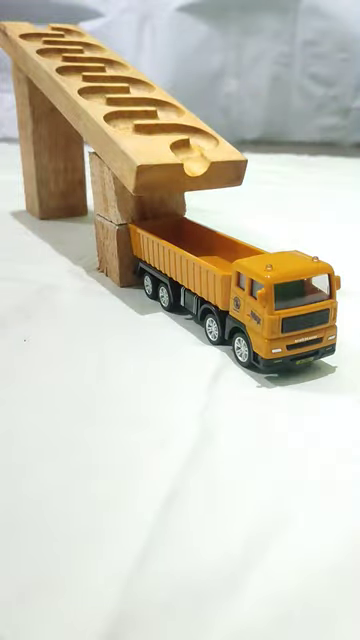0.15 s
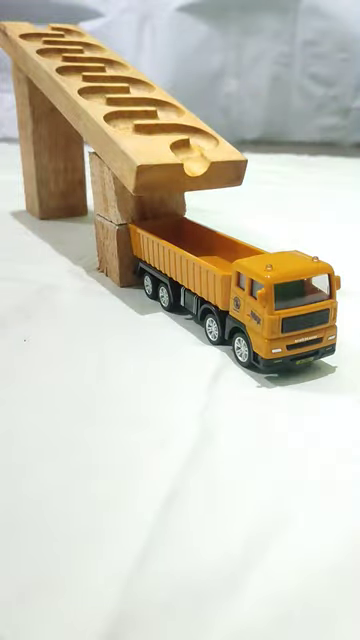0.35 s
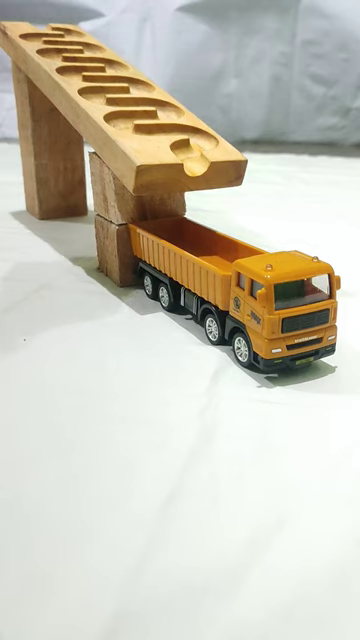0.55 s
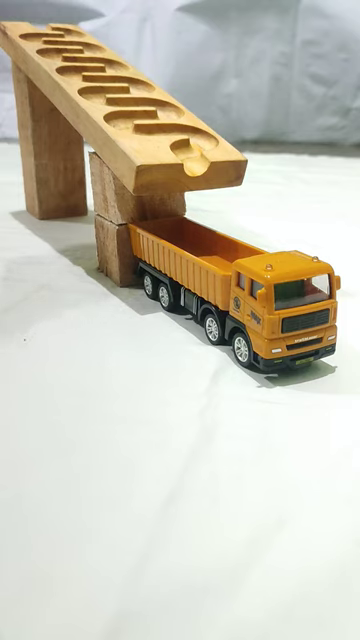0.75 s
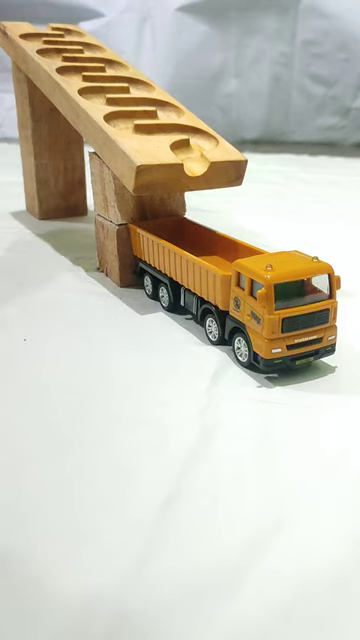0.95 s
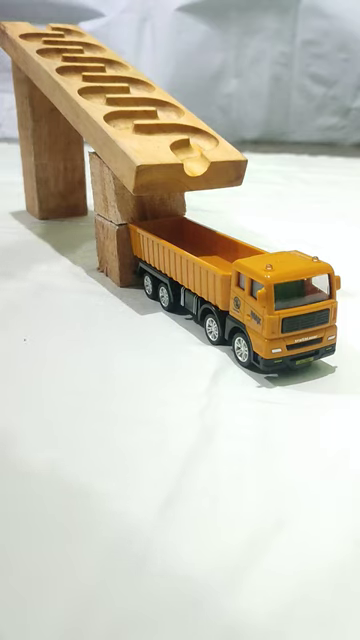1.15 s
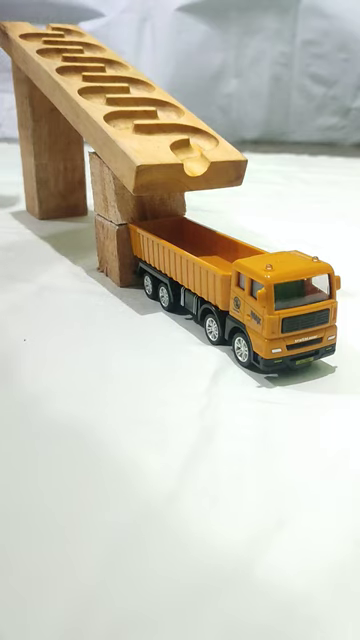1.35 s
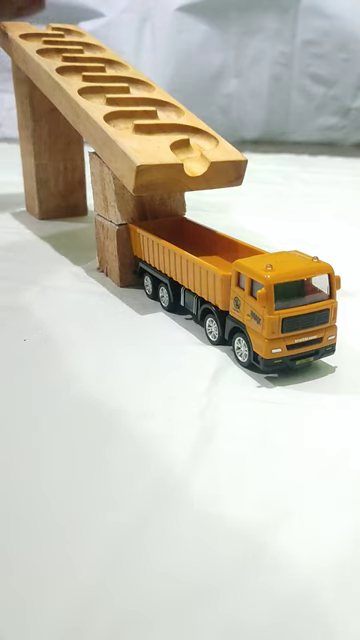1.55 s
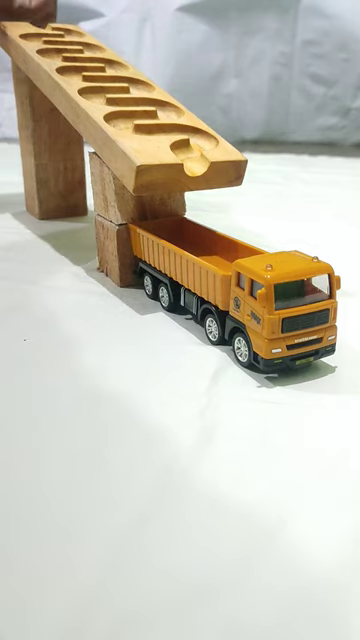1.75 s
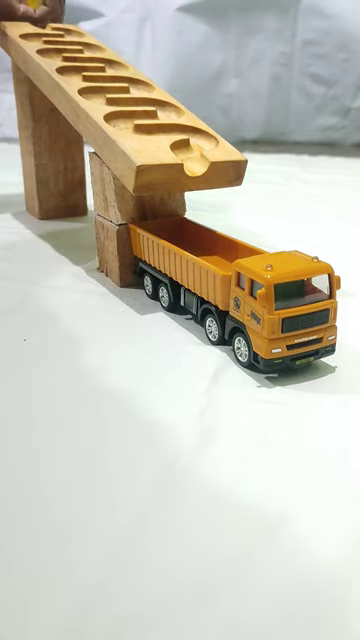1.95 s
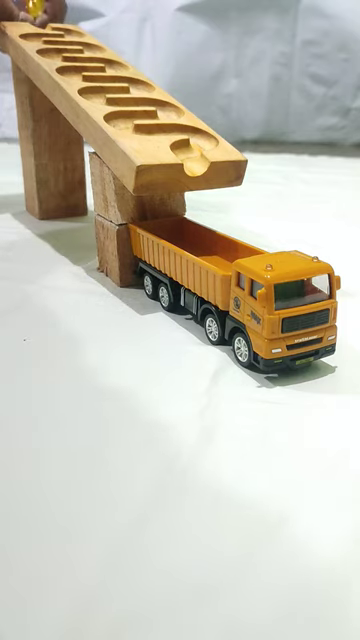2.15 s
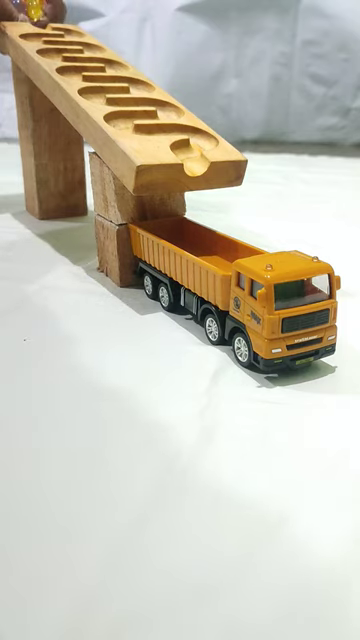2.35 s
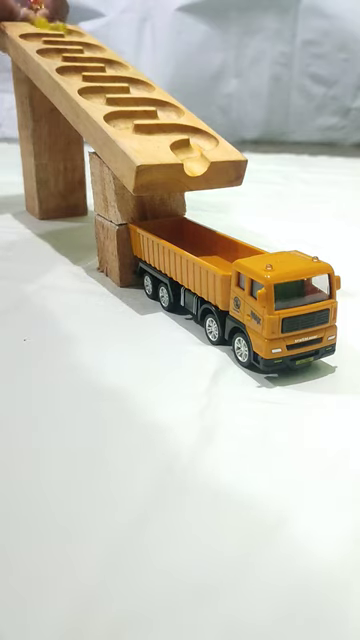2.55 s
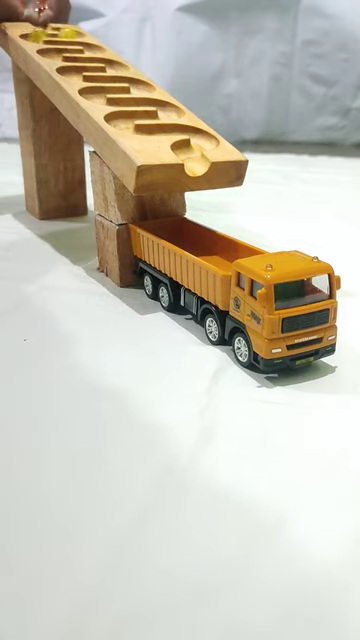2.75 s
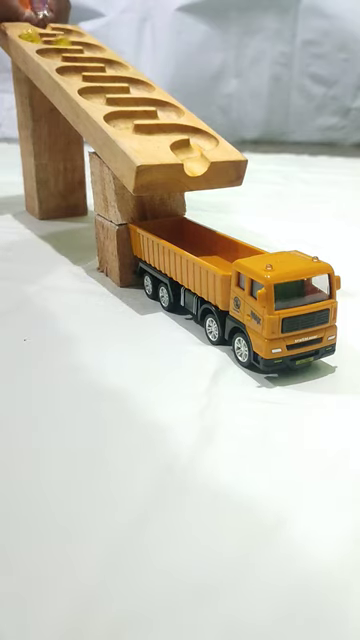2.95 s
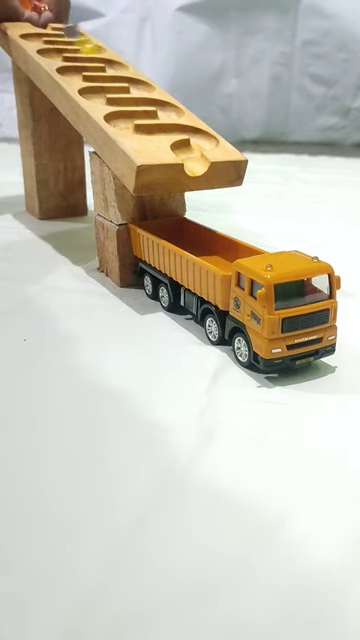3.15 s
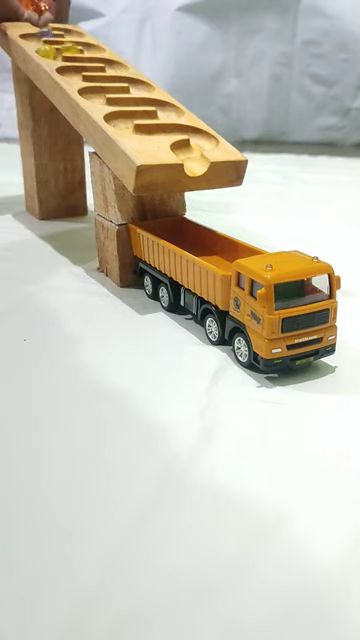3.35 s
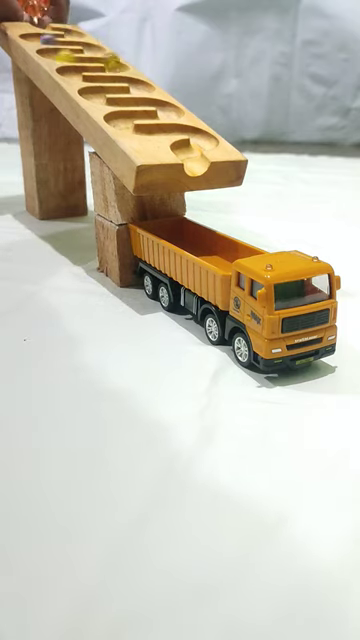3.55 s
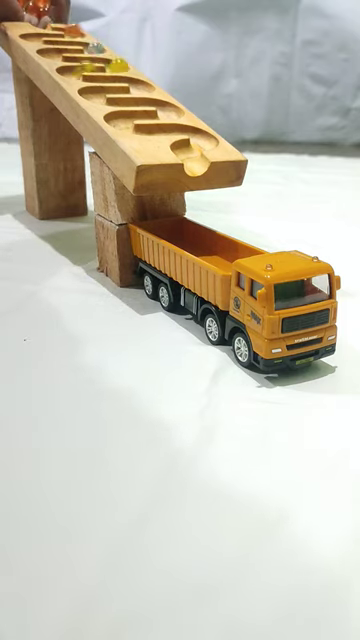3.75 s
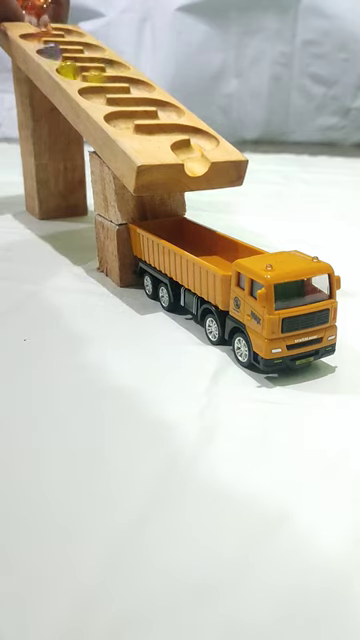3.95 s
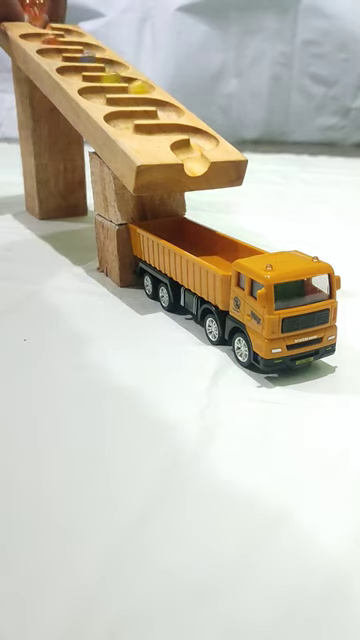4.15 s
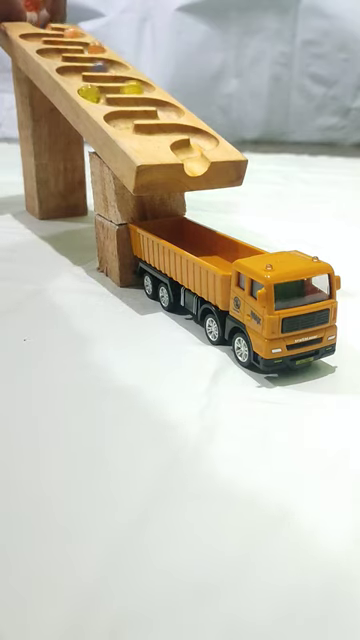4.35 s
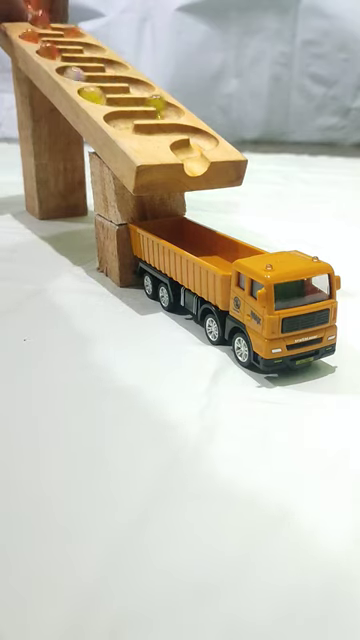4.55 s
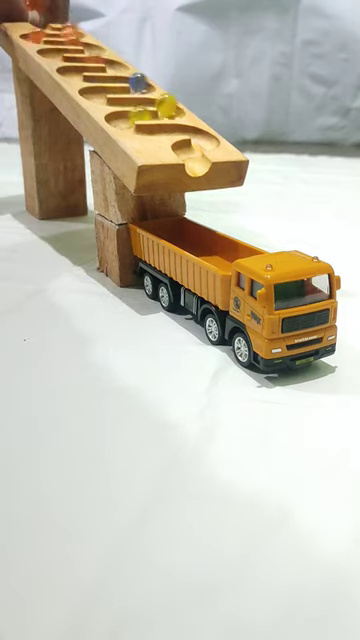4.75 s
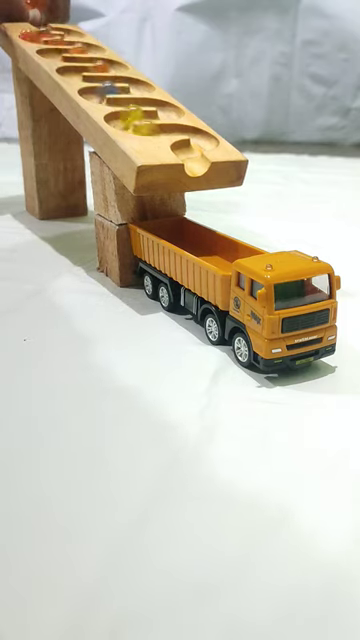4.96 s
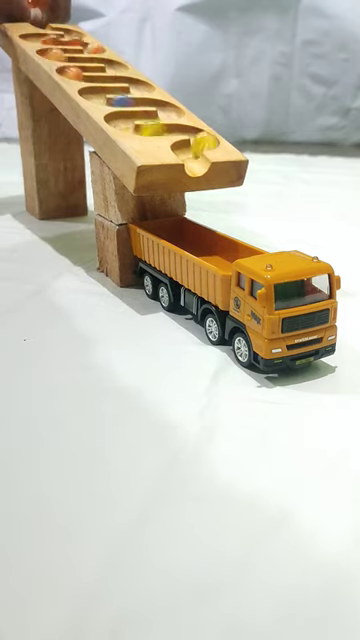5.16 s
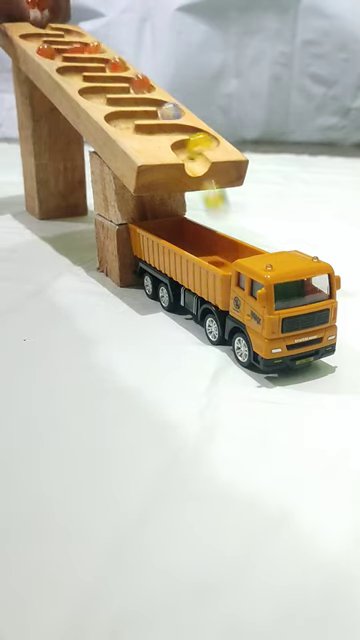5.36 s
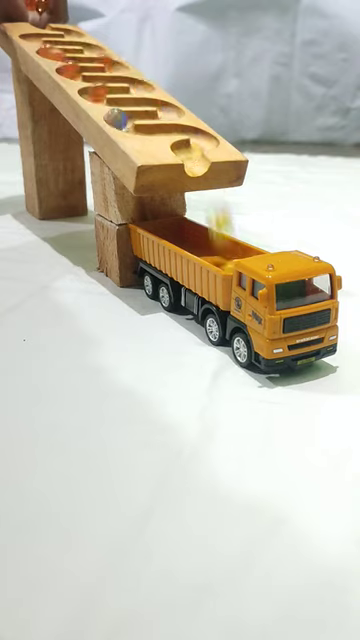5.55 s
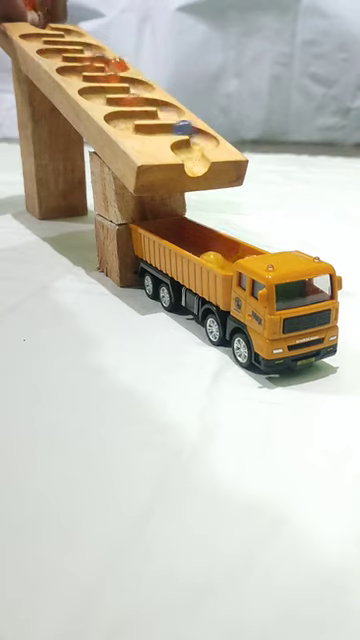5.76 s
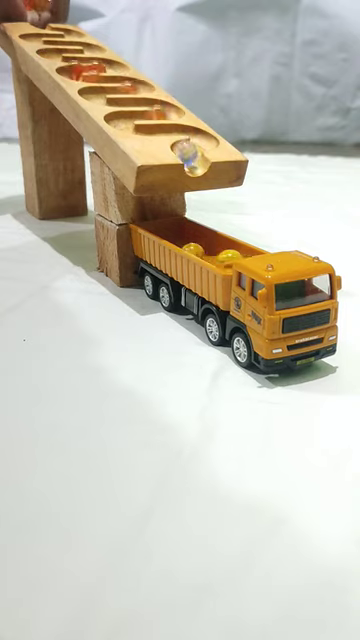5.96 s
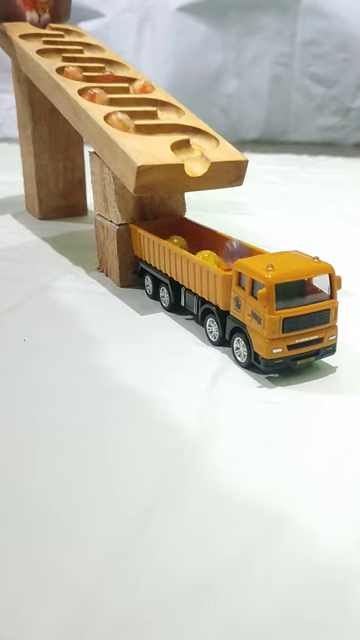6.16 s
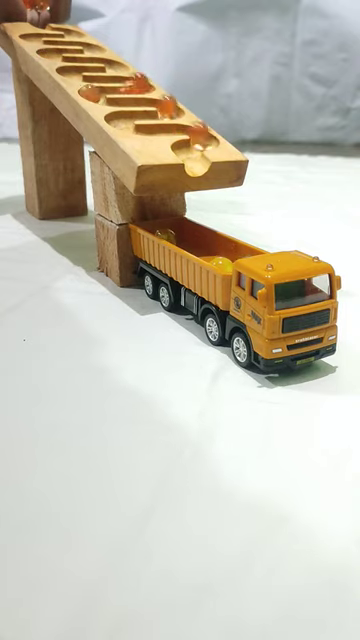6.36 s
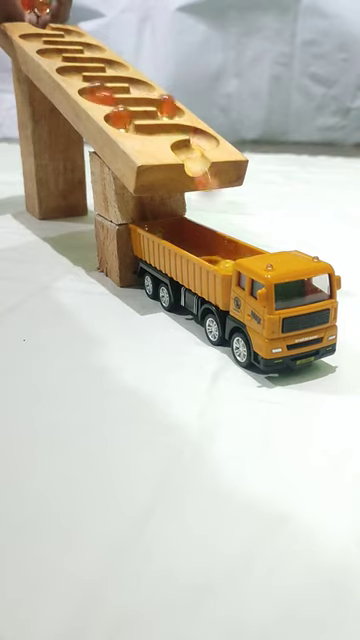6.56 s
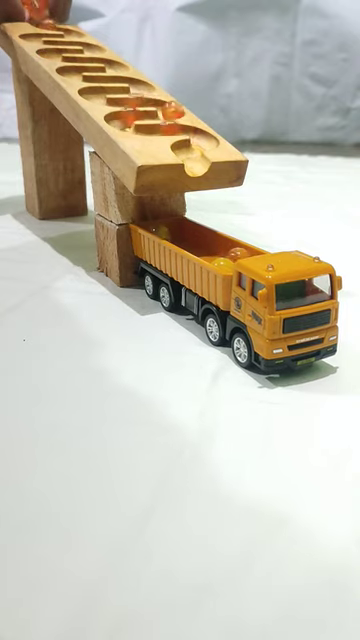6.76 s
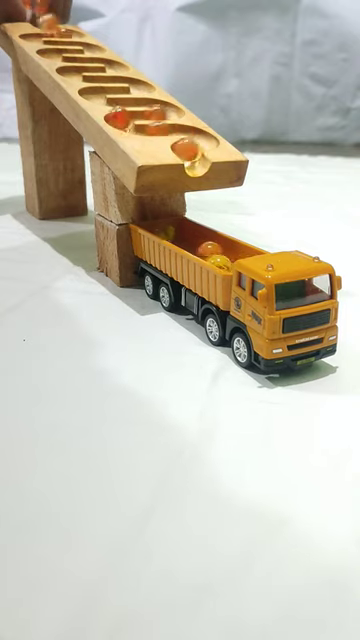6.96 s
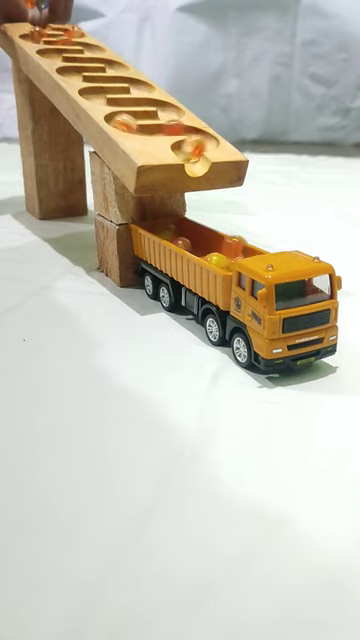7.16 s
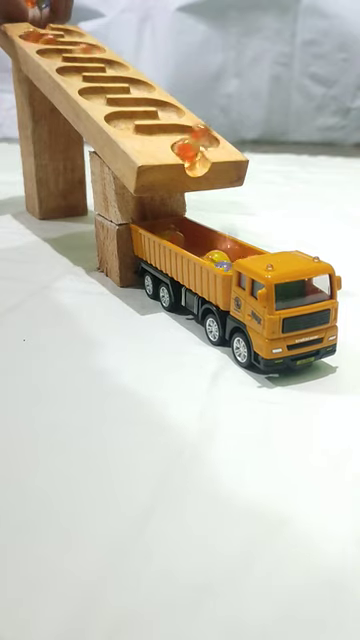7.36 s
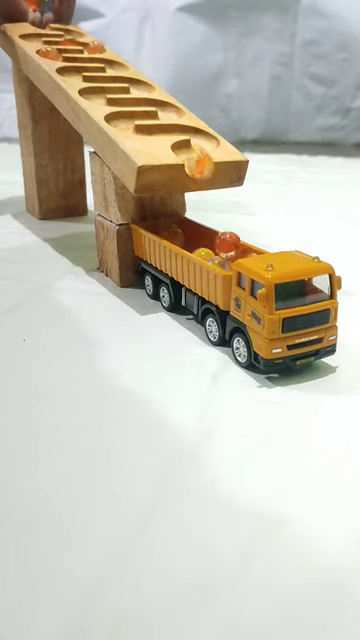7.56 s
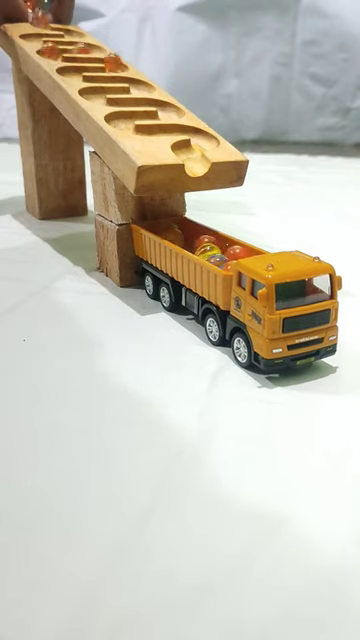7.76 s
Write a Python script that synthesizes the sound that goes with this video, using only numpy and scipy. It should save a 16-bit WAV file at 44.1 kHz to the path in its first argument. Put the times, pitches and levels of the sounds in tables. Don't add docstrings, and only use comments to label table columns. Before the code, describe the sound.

Over two seconds of near silence, a hand barely brushes fabric, with small snapping ticks mostly on the right. Then marbles click together and clatter along wooden grooves, irregular hollow knocks over a light rolling rattle. In the last few seconds, much louder brittle clacks land in a little truck bed, each followed by hops and glassy jostling, crowding together at the end. Close stereo pickup in a small reflective room.

```python
import sys
import numpy as np
from scipy import signal
from scipy.io import wavfile
from scipy.ndimage import uniform_filter1d

SR = 44100
rng = np.random.default_rng(int(sys.argv[2]) if len(sys.argv) > 2 else 0)


def transcribe(signal):
    frames = np.atleast_2d(signal).T
    limited = np.clip(frames, -1, 1)
    pcm = np.round(limited * 32767).astype(np.int16)
    wavfile.write(sys.argv[1], SR, pcm)


def gain_from_db(level_db):
    decades = np.asarray(level_db, float) / 20
    return 10 ** decades


N = 344862

# start_s, blow_db, middle_over_first_mode_db, upper_modes_db
KNOCKS = [(2.5406, -19.5, -6, -29), (2.5727, -15.5, 4, -23), (2.6548, -12, 2.5, -17.5),
          (2.7355, -18.5, -1, -31), (3.1574, -10.5, 5.5, -15), (3.242, -21, 0, -14.5),
          (3.267, -23.5, 8, -14), (3.697, -20.5, -6, -24), (3.7229, -13.5, 5, -18.5),
          (3.8382, -17, -5, -20.5), (4.2718, -8, 1.5, -21.5), (4.375, -20, -0.5, -35),
          (4.5563, -17, -7.5, -49), (4.6024, -20, 0, -12.5), (4.6425, -19, -11, -19),
          (4.6662, -29, 14, -16), (4.6802, -12.5, 3, -20.5), (4.7244, -17.5, -8, -18),
          (4.7691, -15, 8.5, -17.5), (4.8395, -12.5, -3, -24.5), (4.9729, -27, -7, -11),
          (5.4123, -19.5, 1, -18), (6.4625, -20.5, 3, -17), (6.5239, -21.5, -5, -15.5),
          (6.6095, -21.5, -5.5, -19.5), (6.8482, -11.5, 1.5, -37), (6.9177, -12, 1, -19.5),
          (7.1174, -11.5, 1.5, -19.5), (7.1381, -7, 3, -17), (7.223, -24, -9, -11)]
# start_s, blow_db, sharpness_db
TAPS = [(2.5601, -25, -9), (2.683, -27, -2), (2.692, -31, -4.5), (2.7744, -29, -19), (2.903, -28.5, -29),
        (3.037, -32, -31), (3.055, -33, -38), (3.082, -34, -25), (3.14, -27, -30), (3.487, -47, -26),
        (4.108, -34.5, -29), (4.121, -47, -23), (4.147, -30, -27), (3.1324, -36, -32), (3.457, -27.5, -33),
        (3.5785, -24, -30), (3.6305, -23.5, -31), (3.6476, -28, -22.5), (3.734, -20.5, -15.5),
        (3.8844, -31.5, -4.5), (3.965, -30.5, -16), (4.1639, -26, -27.5), (4.395, -26.5, -15),
        (4.4156, -26, -12), (4.58, -25, -16.5), (4.666, -24.5, -8.5), (4.354, -36, -16), (2.811, -45, -25),
        (4.6574, -19, -18), (4.882, -37, -2), (4.9038, -26.5, -15), (4.918, -34, -1), (4.9389, -26, -11.5),
        (4.95, -28, -13), (5.0589, -55, -14), (5.1038, -49, -17), (5.1396, -27.5, -28), (5.217, -30.5, -17),
        (5.259, -39, -28), (5.8682, -30, -23), (6.0148, -35.5, -12), (6.0578, -31, -32), (5.2954, -28, -25),
        (5.3348, -27.5, -30), (5.3555, -21.5, -16), (5.916, -26.5, -28), (5.9468, -29, -13.5),
        (6.0396, -33.5, -17), (6.3609, -23.5, -29), (6.578, -32, -19), (7.0083, -24.5, -7.5)]
TAP_MIDDLE_DB, TAP_MIDDLE_SLOPE = 16.5, 0.73
# time_s, rolling_db, speed_brightness_db
ROLLING = [(2.5, -84, -4), (2.72, -57, 4), (2.9, -54, 0.5), (3.24, -46, 0.5), (3.54, -57.5, -5.5),
           (3.79, -37.5, 4.5), (3.95, -74.5, -13.5), (4.17, -43.5, -2), (4.34, -47, -0.5), (4.72, -48, 4),
           (4.94, -36, 2.5), (5.08, -52.5, -3.5), (5.21, -37, 0), (5.3, -46.5, 1.5), (5.97, -40, 0),
           (6.15, -51, -5.5), (6.5, -42.5, 0.5), (7.82, -43.5, 7.5)]
BUMPS_PER_S, DRIFT_DB, DRIFT_S = 600, 6, 0.025
WANDER, WANDER_S = 0.025, 0.07
# pitch_hz, level_db
RAMP_MODES = [(505, -25.5), (590, -19.5), (720, -14), (1290, -5), (1420, 0.6), (1650, -8.5), (2300, -3),
              (2530, 1.5), (2650, -22), (3210, -14), (3530, -7.5), (3900, 0), (5200, 0), (7070, 4.5)]
RAMP_T60 = [0.078, 0.028, 0.0097, 0.02, 0.055, 0.033, 0.028, 0.026, 0.028, 0.15, 0.06, 0.022, 0.011, 0.0067]
RAMP_GROUPS = [0, 0, 0, 1, 1, 1, 2, 2, 2, 3, 3, 3, 4, 4]
TOP_MODES_DB = -5.5
# mode_strength_db from spot to spot, bump_size_db
SPREAD_DB = [2.5, 2.5]
# wood_rise_s, landing_rise_s, landing_fall_s, room_build_up_s
SOFTNESS_S = [0.00079, 0.00084, .0014, 0.014]
# start_s, blow_db, centre_hz
CLICKS = [(2.434, -29, 7340), (2.4957, -33, 7300), (2.654, -36, 6700), (2.684, -33.5, 6850),
          (2.9067, -29.5, 7200), (3.039, -49, 6700), (3.1605, -35, 6100), (3.263, -41, 6580),
          (3.4927, -48.5, 6800), (3.838, -37.5, 6800), (4.273, -35, 7200), (4.388, -42.5, 9000),
          (4.452, -38, 9000), (4.468, -32.5, 7000), (4.492, -29, 8700), (4.498, -36, 9000),
          (4.6567, -31, 7200), (5.0594, -50.5, 6620), (5.1386, -45, 7000), (5.4106, -40, 6660),
          (6.0336, -42, 6660), (6.5254, -33, 7130), (6.626, -38.5, 6850), (6.724, -32.5, 8000),
          (7.0044, -36, 7000), (6.4415, -69, 8000), (6.495, -36, 7000), (6.5757, -56, 7500),
          (6.9399, -38, 8000), (4.074, -47.5, 6900), (4.442, -38, 8000), (2.694, -30, 7000),
          (3.14, -47, 7000), (4.972, -46.5, 7240), (4.884, -40, 7500), (2.4332, -41.5, 3800),
          (2.4955, -57, 3300)]
# start_s, blow_db, centre_hz
SPARKS = [(3.4947, -56, 8000), (3.604, -56, 9900), (4.387, -36, 10000), (4.448, -36.5, 10000),
          (4.4688, -30.5, 8500), (4.4893, -29, 10000), (4.6047, -43, 9000), (4.644, -44, 10000),
          (4.657, -34.5, 10000), (5.6359, -35, 9000), (6.5258, -30.5, 9000), (6.5758, -37, 9000),
          (6.629, -30, 8500), (6.9399, -41, 10000), (7.0068, -27, 9000), (7.311, -30, 9000),
          (7.344, -35, 8000), (7.7571, -20, 8000), (6.305, -32, 9000)]
# start_s, blow_db, ring_hz
NUDGES = [(2.5633, -44.5, 5050), (2.691, -32.5, 5200), (3.1422, -54, 4730), (3.266, -35.5, 5070),
          (3.7237, -38, 5100), (3.8377, -45, 4850), (3.886, -37, 5150), (4.274, -37.5, 5240),
          (4.418, -37, 4900), (4.6075, -37.5, 4540), (4.6543, -39, 5150), (4.803, -37.5, 4380),
          (4.887, -41, 4700), (4.9046, -37.5, 4800), (5.1632, -45, 4730), (5.349, -41, 5100),
          (5.386, -43, 5000), (6.442, -45, 5030), (6.495, -34.5, 4400), (6.523, -40, 5200),
          (7.012, -32, 4430)]
CLICK_PAN_DB, NUDGE_PAN_DB = -3.5, -16.5
# start_s, blow_db, left_right_db, bed_db, clack_db (upper panels)
FALLS = [
    (5.4865, -6.5, 2.5, 1, 0.5),
    (5.6675, -7, 7.5, 0, 0),
    (6.1874, -6.5, 1, -1.5, 1.5),
    (6.7381, -6.5, 4, -4, 0.5),
    (7.2461, -7.5, -7.5, -0.5, 2),
    (7.4845, -6, 5.5, -1.5, -0.5),
    (7.6445, -6, 0, -1.5, 3.5),
]
# start_s, blow_db, bed_db (low when glass meets glass), clack_db, sparkle_db
HOPS = [(5.5577, -18, -3.5, -4, -7.5), (5.7441, -16, -1.5, 1, 1), (6.2611, -17.5, 1, -1, -3),
        (6.8179, -14.5, -4, -3.5, -9), (7.3259, -15.5, -1, -2.5, -4), (7.558, -14.5, 1, 1.5, -1.5),
        (7.726, -15.5, 3.5, 2.5, 3.5), (7.482, -20, -0.5, 4, 2), (5.483, -28, -4, -11, -2),
        (5.613, -19.5, -2.5, -0.5, -1.5), (5.7918, -17.5, -2, -1.5, -3), (6.1801, -16, -10, 4, 4),
        (6.2873, -23.5, -4, -0.5, -4), (6.8074, -15.5, -3, 4.5, 3), (7.3497, -20.5, 0, 0.5, -3),
        (7.394, -29, -29, 4, 0), (7.7594, -8, -0.5, 1, -3), (7.7875, -7.5, -2, -1, -4),
        (6.7364, -14, 2, 3, -3)]
FALL_SPARKLE_DB, HOP_PAN_DB = -5, 8
# pitch_hz, density_db_per_hz
BED_CHATTER = [(300, -18.5), (1000, 0), (1450, -2), (2100, -4.5), (2950, -2), (3900, -2.5), (4900, -11),
               (6000, -4), (6900, -0.5), (7600, -9), (8500, -9.5), (11500, -5), (14000, -10.5),
               (15500, -17.5)]
# pitch_hz, level_db, t60_s
BED_RINGS = [(1350, -22, 0.017), (1618, -19, 0.036), (2323, -23.5, 0.027), (2920, -25, 0.019),
             (3730, -14.5, 0.014), (4050, -6.5, 0.0072), (4390, -14, 0.007), (5960, -19, 0.006),
             (6620, -29, 0.026), (6845, -20, 0.022), (7200, -11, 0.0097), (7750, -20.5, 0.01)]
CHATTER_DB, PANEL_SPREAD_DB = -1, 3.5
# start_s, left_db, right_db
JOLTS = [
    (5.4851, -41, -15),
    (5.668, -41, -10.5),
    (6.1892, -35, -10.5),
    (6.738, -27, -6),
    (7.2422, -38, -9.5),
    (7.4843, -33.5, -14),
    (7.6428, -31, -4),
    (7.7856, -34, -24),
]
# smoothing_hz, left_recovery_hz, right_hold_hz, right_recovery_hz
SWING_HZ = [160, 55, 2.8, 1.2]
# pitch_hz, t60_s
ROOM_T60 = [(300, 1), (1000, 0.45), (2500, 0.49), (6000, 0.34), (12000, 0.28)]
# delay_s, left_db, right_db, extra_right_lag_samples
WALL_ECHOES = [
    (.0097, -7.5, -10.5, 5),
    (0.0185, -9.5, -12, -8),
    (0.036, -22, -22, 9),
]
TAIL = SR * 9 // 20
DULL_DB = -2
# pitch_hz, left_right_db
PORTS = [(500, 0.5), (1300, -4.5), (2400, 0.8), (4400, -3), (8000, -0.5), (15000, -0.5)]
# start_s, rise_s, fall_s, level_db
STROKES = [(0.579, 0.039, 0.0075, -60), (.76, .015, 0.012, -71), (.865, 0.027, 0.031, -66.5),
           (.97, 0.048, 0.086, -64), (1.1, 0.068, 0.15, -70), (1.33, 0.05, 0.041, -76),
           (1.45, 0.036, 0.035, -75), (1.63, 0.02, 0.014, -68), (1.71, 0.051, 0.037, -68.5),
           (1.8, 0.016, 0.026, -71.5), (1.97, 0.015, 0.02, -72.5), (2.07, 0.031, 0.0092, -69),
           (2.16, 0.038, 0.044, -69.5), (4.41, 0.17, 0.057, -50.5), (4.5, 0.05, 0.14, -53),
           (4.06, .05, 0.079, -71), (6.5, 0.0083, 0.061, -46.5), (7.02, 0.018, 0.45, -52.5),
           (3.56, 0.13, 0.23, -68.5)]
# pitch_hz, density_db_per_hz
CLOTH = [(300, -9.5), (1000, -3.5), (2000, 2), (5000, -2.5), (7000, 2.5), (8200, -13), (13500, -9.5),
         (15000, -19)]
# start_s, level_db, centre_hz, left_right_db
TICKS = [
    (.3925, -53, 700, -28),
    (.70, -55, 3500, -8),
    (1.554, -53.5, 500, -23),
    (1.813, -73, 6000, -10),
    (2.074, -41.5, 6060, -46),
    (2.13, -42, 9000, -13),
    (2.168, -42.5, 6640, -43),
]
# start_s, level_db
FIBRES = [(0.39, -51), (0.5133, -63), (0.5363, -60), (0.5368, -55), (0.5448, -58), (0.5637, -53),
          (0.7019, -64), (0.7538, -64), (0.8571, -65), (0.8571, -49), (0.9704, -41.5), (1.2217, -56),
          (1.4752, -60), (1.54, -52), (1.556, -54), (1.6163, -50), (1.6193, -51), (1.6268, -46),
          (1.673, -48), (1.7165, -39), (1.7493, -47.5), (1.795, -50), (1.8145, -48), (1.9486, -54),
          (2.0449, -48), (2.0528, -66), (2.0528, -47), (2.0738, -58), (2.1307, -59), (2.167, -54)]
# pitch_hz, density_db_per_hz
HUSH = [(8.8, -30), (15, 23), (55, -5.5), (162, -13.5), (236, -15.5), (344, -23.5), (422, -21.5),
        (548, -26), (634, -26.5), (13700, -39.5), (15400, -59)]
HUSH_DB = -65
# pitch_hz, left_right_likeness
HUSH_LIKENESS = [(60, 0.26), (240, 0.65), (950, 0), (3770, 0), (15000, 0)]
# pitch_hz, left_right_db
HUSH_LEAN = [(60, -3.5), (240, -2), (950, -1.5), (3770, -4.5), (15000, -3.5)]
CEILING = 0.9


def read(points, hz):
    f, value = np.transpose(points)
    return np.interp(np.log(hz + 1), np.log(f + 1), value)


def curve(rows):
    s, db = np.transpose(rows)
    return gain_from_db(np.interp(np.arange(N) / SR, s, db, -140, -140))


def evened(x):
    return x / np.sqrt(np.mean(x ** 2) + 1e-20)


def add(mix, s, sound):
    part = mix[..., round(s * SR):][..., :sound.shape[-1]]
    part += sound[..., :part.shape[-1]]


def panned(db, pan_db):
    return gain_from_db(db + np.array([[pan_db / 4], [-pan_db / 4]]))


def colour(x, db_of):
    hz = abs(np.fft.fftfreq(2048, 1 / SR))
    log_gain = np.log(gain_from_db(np.maximum(db_of(hz), -100)))
    taps = np.fft.ifft(np.exp(np.conj(signal.hilbert(log_gain)))).real[:1024]
    taps = taps.reshape((1,) * (x.ndim - 1) + (-1,))
    return signal.oaconvolve(x, taps, axes=-1)[..., :x.shape[-1]]


def ramp():
    out, t = np.zeros(N), np.arange(3000) / SR
    hz, mode_db = np.transpose(RAMP_MODES)
    decay_db = -60 * t / np.array(RAMP_T60)[:, None]
    rise = 1 - np.exp(-(t / SOFTNESS_S[0]) ** 2)
    for s, db, middle_db, upper_db in knocks():
        strength, shift = rng.standard_normal((2, len(RAMP_MODES)))
        group_db = np.array([-0.3 * (db + 34), -middle_db / 2 - 10.5, middle_db / 2 - 8,
                             upper_db + 4.5, upper_db + 10 + TOP_MODES_DB])[RAMP_GROUPS]
        start_db = db + mode_db + group_db + SPREAD_DB[0] * strength
        spot_hz = hz * (1 + 0.03 * shift)
        rings = gain_from_db(start_db[:, None] + decay_db) * np.sin(2 * np.pi * spot_hz[:, None] * t)
        add(out, s, rings.sum(0) * rise)
    return out + rolling()


def knocks():
    taps = [(s, db, TAP_MIDDLE_DB + TAP_MIDDLE_SLOPE * sharp_db, sharp_db) for s, db, sharp_db in TAPS]
    return KNOCKS + taps


def rolling():
    t, out = np.arange(N) / SR, np.zeros(N)
    s, _, speed_db = np.transpose(ROLLING)
    speed_db = np.interp(t, s, speed_db)
    size = gain_from_db(SPREAD_DB[1] * np.minimum(rng.exponential(1, N), 4))
    bumps = size * (rng.random(N) < BUMPS_PER_S / SR) * rng.choice([-1, 1], N)
    drift = rng.standard_normal((12, 400)) + 0.61 * rng.standard_normal(400)
    for k in range(12):
        hz, db = RAMP_MODES[k]
        t60, group = RAMP_T60[k] * 0.29, RAMP_GROUPS[k]
        swell_db = DRIFT_DB * np.interp(t / DRIFT_S, np.arange(400), drift[k]) + (group - 1) * speed_db
        bend = WANDER * np.interp(t / WANDER_S, np.arange(400), drift[k - 1])
        cycles = np.cumsum(hz * (1 + bend)) / SR
        angle = (2 * np.pi * (cycles % 1)).astype(np.float32)
        turn = np.cos(angle) + 1j * np.sin(angle)
        drive = np.roll(bumps, 4999 * k)
        drive[drive != 0] *= gain_from_db(swell_db[drive != 0])
        r = 1000 ** (-1 / (t60 * SR))
        ring = signal.lfilter([1], [1, -2 * r, r * r], drive * turn.conj())
        mode = gain_from_db(db) * (turn * ring).real / (t60 * SR)
        out += gain_from_db([7.5, 2.5, -1.5, -7.0][group]) * mode
    return curve([row[:2] for row in ROLLING]) * evened(out / gain_from_db(speed_db))


def clicks(rows, ms, octaves, skirt_db, above_db, below_db):
    out, t = np.zeros((2, N)), np.arange(600) / SR
    for s, db, centre_hz, pan_db in rows:
        def hump_db(hz):
            away = np.log2((hz + 1) / centre_hz)
            skirt = skirt_db + np.where(away > 0, above_db, below_db) * abs(away)
            return np.maximum(-12 * (away / octaves) ** 2, skirt)

        snap = ((t == 0) * 2 + rng.standard_normal(600)) * np.exp(-t * 1000 / ms)
        snap = colour(snap, hump_db)
        add(out, s, panned(db + 3, pan_db) * snap / abs(snap).max())
    return out


def truck():
    out, t = np.zeros((2, N)), np.arange(1500) / SR
    hz, ring_db, t60 = np.transpose(BED_RINGS)[..., None]
    rise = 1 - np.exp(-t / SOFTNESS_S[1])
    fall = np.exp(-t / SOFTNESS_S[2]) + 0.27 * np.exp(-t / 0.007)
    for s, db, bed_db, clack_db, sparkle_db, pan_db in landings():
        a, b = rng.standard_normal((2, 1500))
        chatter = np.array([a, 0.5 * a + 2.46 * b]) * rise * fall
        bands_hz = [2840, 3030, 4800, 5650, 8000, 9000]
        bands_db = [bed_db, 0, 0, clack_db, clack_db, sparkle_db]
        hit = colour(chatter, lambda f: read(BED_CHATTER, f) + np.interp(f, bands_hz, bands_db))
        spot, phase = rng.standard_normal((2, 2, len(hz), 1))
        panel_db = ring_db + bed_db * (hz < 3200) + clack_db * (hz > 5000) + PANEL_SPREAD_DB * spot
        panels = gain_from_db(panel_db - 60 * t / t60) * np.sin(2 * np.pi * hz * t + 1.17 * phase)
        hit = gain_from_db(CHATTER_DB) * hit / abs(hit).max() + rise * panels.sum(1)
        add(out, s - 0.0005, panned(db + 7, pan_db) * hit)
    return colour(out, lambda f: np.interp(f, [500, 950, 1250], [-10, -16, 0]))


def landings():
    falls = [(s, db, bed_db, clack_db, FALL_SPARKLE_DB, pan_db) for s, db, pan_db, bed_db, clack_db in FALLS]
    return falls + [(*hop, HOP_PAN_DB) for hop in HOPS]


def jolts():
    def pole(x, hz, kind):
        return signal.lfilter(*signal.butter(1, hz / SR * 2, kind), x)

    smooth_hz, left_hz, hold_hz, right_hz = SWING_HZ
    push = np.zeros((2, N))
    for s, *db in JOLTS:
        add(push, s, gain_from_db(np.array(db))[:, None] * np.exp(-np.arange(800) / SR / 0.0026))
    push = pole(push, smooth_hz, "low")
    left = pole(push[0], left_hz, "high")
    slow_right = pole(pole(push[1], hold_hz, "low"), right_hz, "high")
    return np.array([left, 0.07 * pole(push[1], left_hz, "high") - slow_right])


def cloth():
    t, effort = np.arange(N) / SR, np.zeros(N)
    for s, rise, fall, db in STROKES:
        effort += gain_from_db(db) * np.exp(-((t - s) / np.where(t < s, rise, fall)) ** 2)
    size = gain_from_db(0.62 * np.minimum(rng.exponential(1, N), 4))
    snaps = size * (rng.random(N) < 9000 / SR) * rng.standard_normal(N)
    rustle = evened(colour(snaps, lambda hz: read(CLOTH, hz)))
    return effort * rustle * gain_from_db(np.array([[-3.0], [2.5]]))


def straight(x, lag, late=0):
    both = np.pad(x * np.ones((2, 1)), ((0, 0), (SR, SR)))
    return np.array([both[0, SR - late:][:N], both[1, SR - late - round(lag):][:N]])


def walls(x, walls_db):
    out = np.zeros((2, N))
    for delay_s, left_db, right_db, lag in WALL_ECHOES:
        gain = gain_from_db(walls_db + np.array([[left_db], [right_db]]))
        out += gain * straight(x, lag, round(delay_s * SR))
    return out


def room(x, lag, wet_db, shared):
    taps = rng.standard_normal((2, TAIL))
    taps[1] = shared * np.roll(taps[0], round(lag)) + np.sqrt(1 - min(shared, 1) ** 2) * taps[1]
    hz, t, z = signal.stft(taps, SR, nperseg=256)
    decay_db = -60 * t / read(ROOM_T60, hz)[:, None] + DULL_DB * (hz > 8000)[:, None]
    tail = signal.istft(z * gain_from_db(decay_db), SR, nperseg=256)[1][:, :TAIL]
    tail *= gain_from_db(wet_db) / np.linalg.norm(tail[0])
    tail *= np.minimum(np.arange(TAIL) / SR / SOFTNESS_S[3], 1)
    return signal.fftconvolve(x * np.ones((2, 1)), tail, axes=1)[:, :N]


def wandering(x, lag, wet_db, shared, walls_db):
    turn = np.arange(N) / SR * 3
    direct = straight(x, lag)
    echoes = room(x * np.cos(turn), lag, wet_db, shared) + room(x * np.sin(turn), lag, wet_db, shared)
    return direct + walls(direct, walls_db) + echoes


def hush():
    hz = np.fft.rfftfreq(1024, 1 / SR)
    a, b, c, d, lumps = rng.standard_normal((N // 256 + 5, 513, 5)).T
    lumps = evened(uniform_filter1d(uniform_filter1d(lumps, 6, 0), 10, 1))
    same = np.clip(read(HUSH_LIKENESS, hz), -1, 1)[:, None]
    left = a + 1j * b
    right = same * left + np.sqrt(1 - same ** 2) * (c + 1j * d)
    z = np.array([left, right]) * gain_from_db(read(HUSH, hz)[:, None] + 2 * lumps)
    z *= gain_from_db(np.array([0.5, -0.5])[:, None, None] * read(HUSH_LEAN, hz)[:, None])
    return gain_from_db(HUSH_DB + 2) * evened(signal.istft(z, nperseg=1024, noverlap=768)[1][:, :N])


def scene():
    sparks = clicks([(*row, CLICK_PAN_DB) for row in SPARKS], 0.15, 1.0, -6, -1, -7)
    wood = ramp()
    nudges = clicks([(*row, NUDGE_PAN_DB) for row in NUDGES], 15, 0.49, -20, -5, -9)
    near = wandering(wood + nudges, 15.15, -2.5, 0.51, -1)
    glass = clicks([(*row, CLICK_PAN_DB) for row in CLICKS], 0.17, 0.37, -7, -3.5, -6.5)
    near += wandering(gain_from_db(-8.5) * sparks + glass, 14, 8.6, 0.06, -0.5)
    near += wandering(truck(), 17, -3, 0.69, 0.31) + straight(sparks, 14)

    def bass_db(hz):
        return np.interp(hz, [99, 234, 477, 495], [-30, -2, -8, 1])

    near = np.array([colour(near[k], lambda hz: bass_db(hz) + (0.5 - k) * read(PORTS, hz)) for k in (0, 1)])
    ticks = clicks(TICKS + [(s, db, 4500, -12) for s, db in FIBRES], 0.36, 2.3, -14, -3, 4)
    hand = cloth() + colour(ticks, lambda hz: np.interp(hz, [7600, 8300], [0, -11]))
    hand_echoes = walls(hand, -2) + room(hand, 0, -11.5, 0.034)
    return near + hand + hand_echoes + hush() + jolts()


def top_cut(x):
    return signal.sosfilt(signal.butter(12, 15570, fs=SR, output="sos"), x)


def record(dry):
    fade_in = np.minimum(np.arange(N) / SR / 0.017, 1)
    x = CEILING * np.tanh(dry / CEILING) * fade_in
    x = colour(x, lambda hz: np.interp(hz, [14100, 14400, 16000], [0, -12, -9]))
    return top_cut(x)


dry = scene()
out = record(dry)
transcribe(out)
```